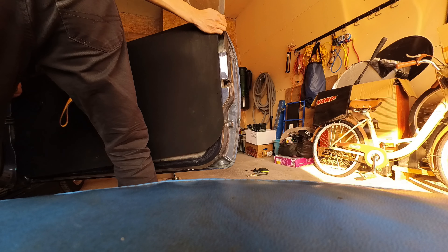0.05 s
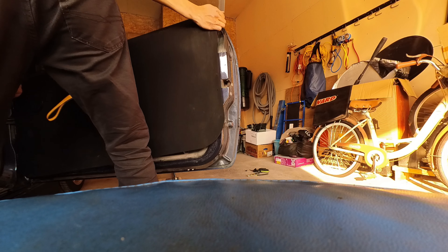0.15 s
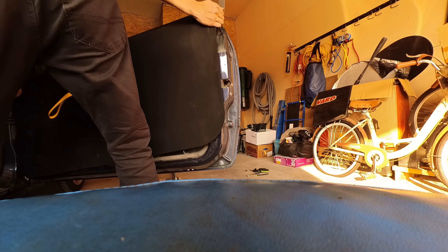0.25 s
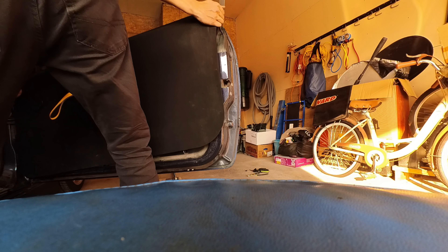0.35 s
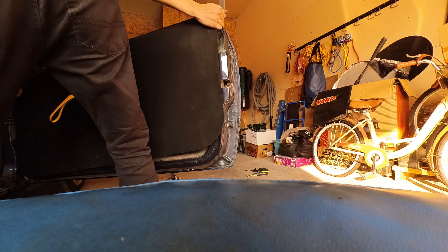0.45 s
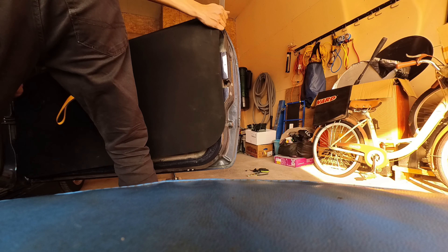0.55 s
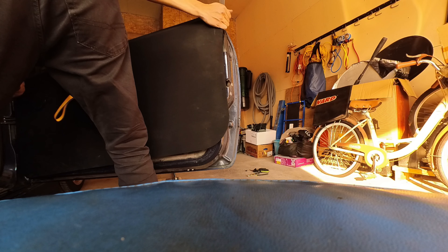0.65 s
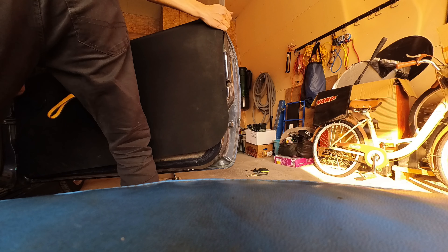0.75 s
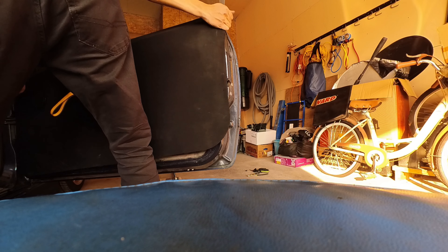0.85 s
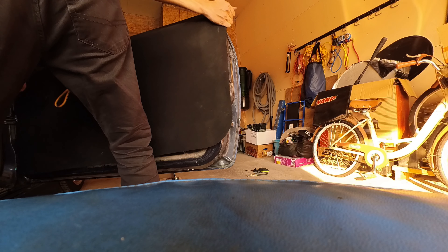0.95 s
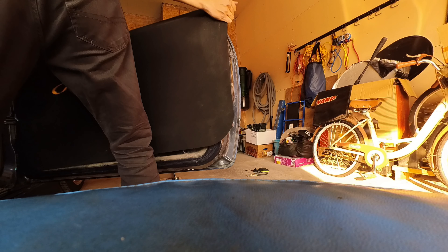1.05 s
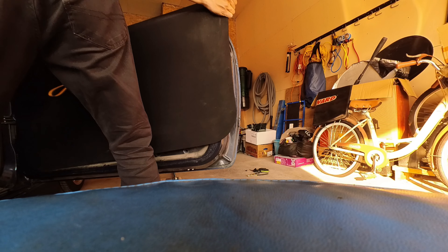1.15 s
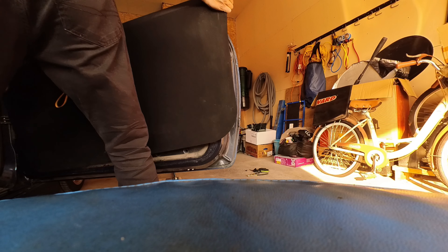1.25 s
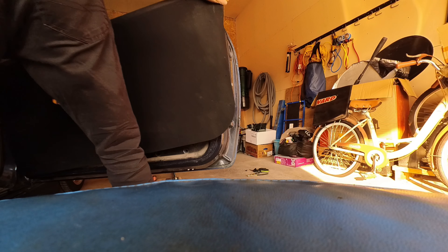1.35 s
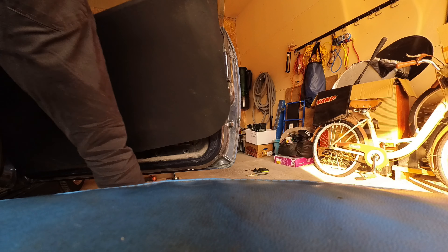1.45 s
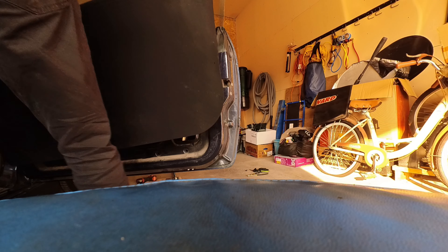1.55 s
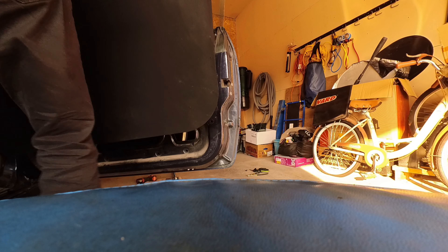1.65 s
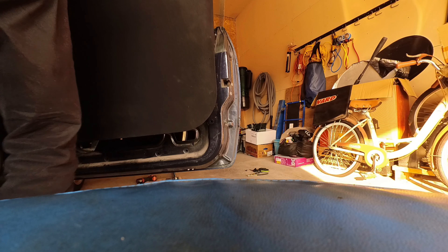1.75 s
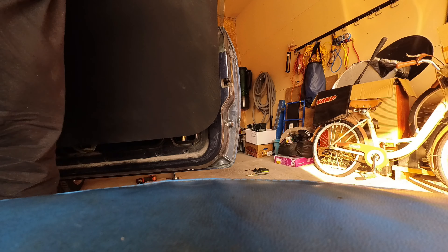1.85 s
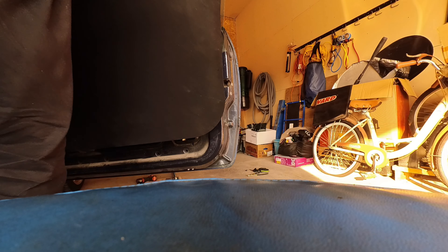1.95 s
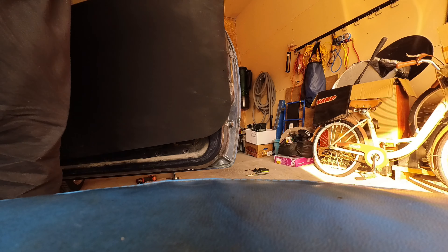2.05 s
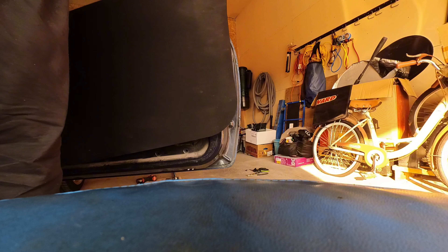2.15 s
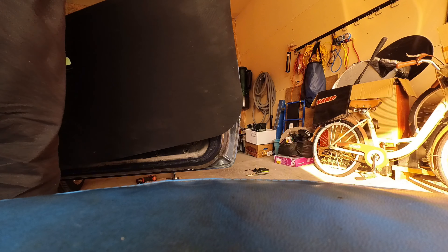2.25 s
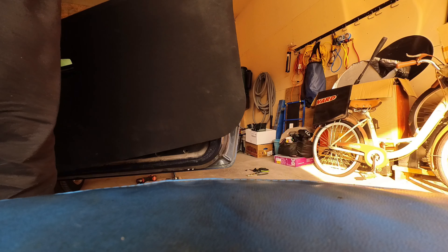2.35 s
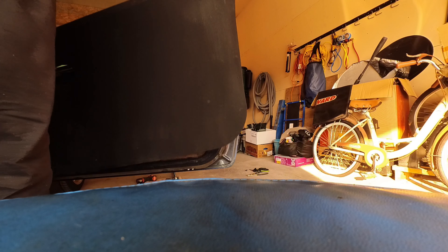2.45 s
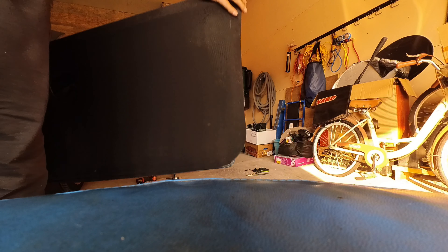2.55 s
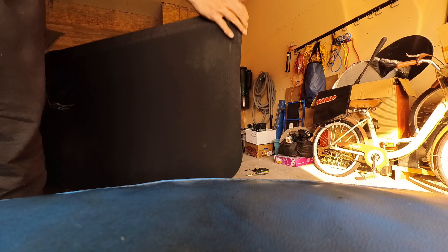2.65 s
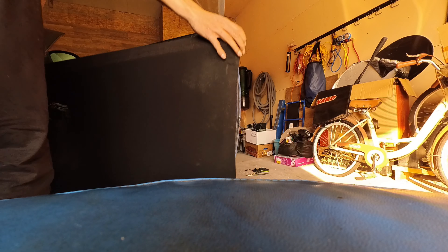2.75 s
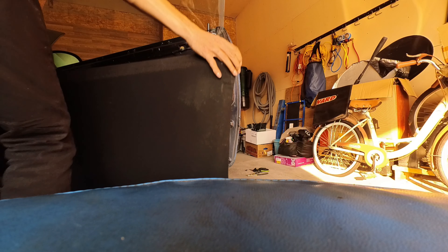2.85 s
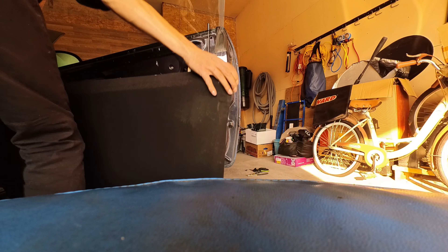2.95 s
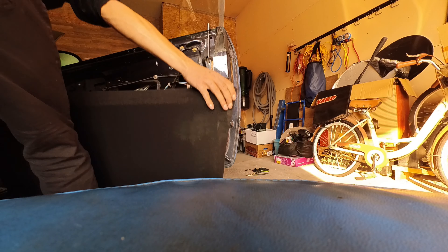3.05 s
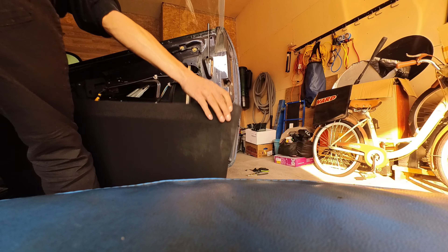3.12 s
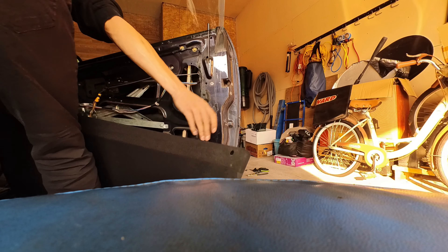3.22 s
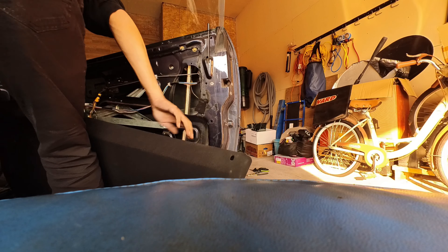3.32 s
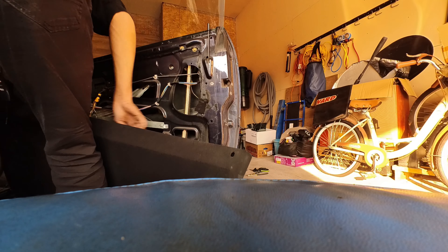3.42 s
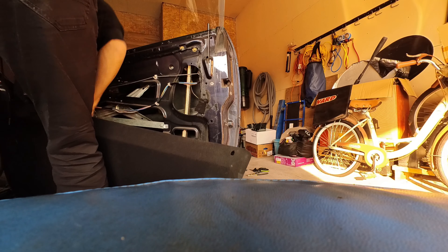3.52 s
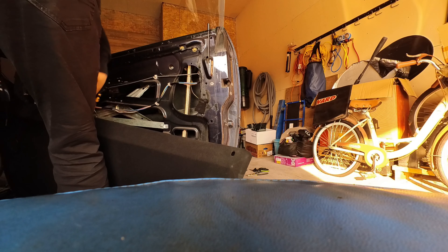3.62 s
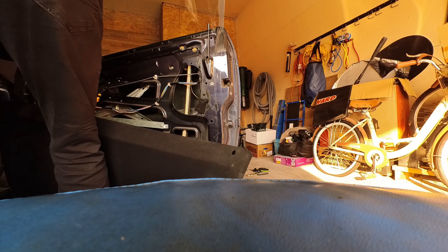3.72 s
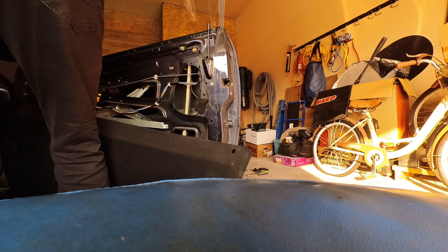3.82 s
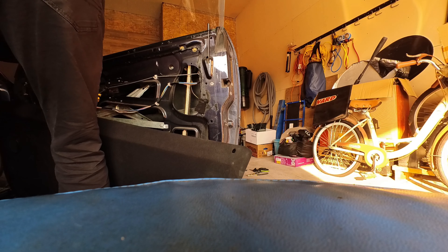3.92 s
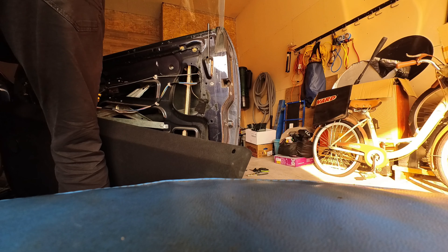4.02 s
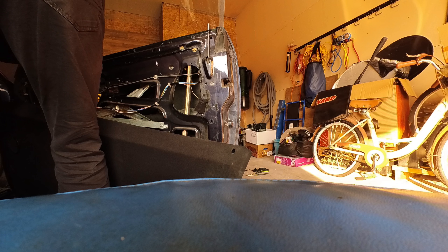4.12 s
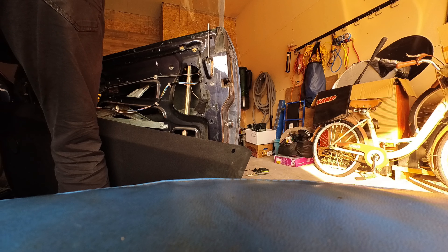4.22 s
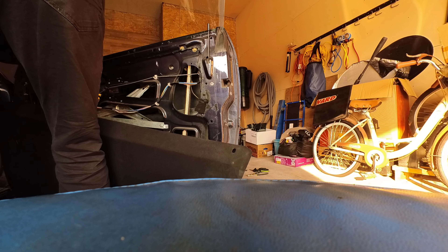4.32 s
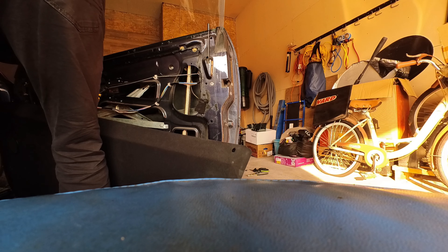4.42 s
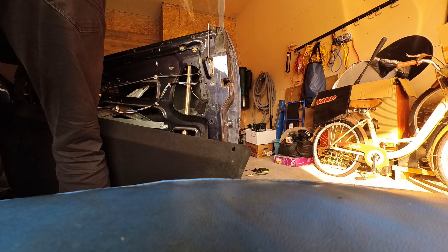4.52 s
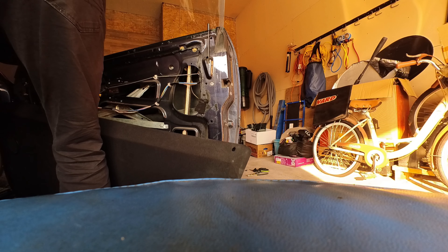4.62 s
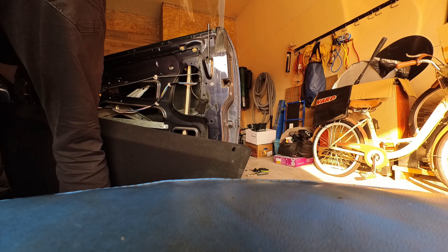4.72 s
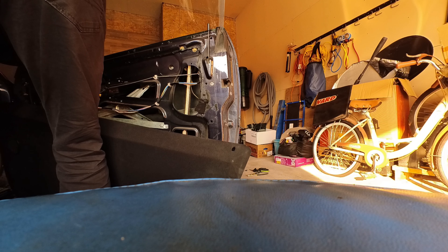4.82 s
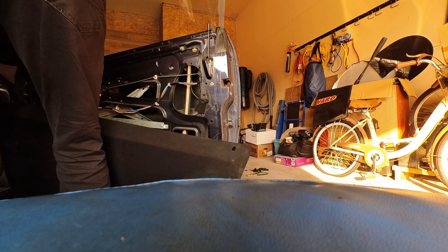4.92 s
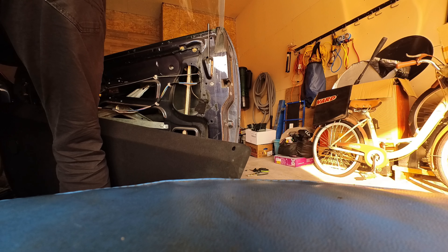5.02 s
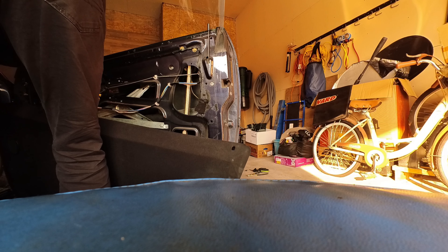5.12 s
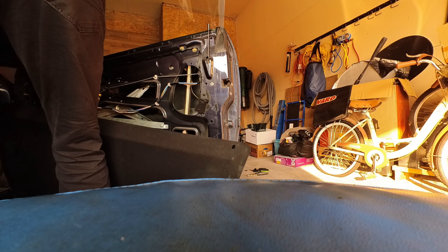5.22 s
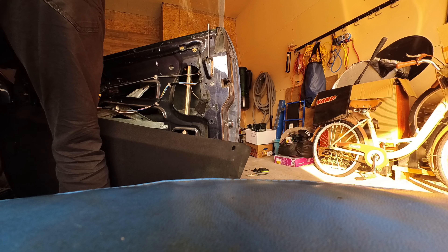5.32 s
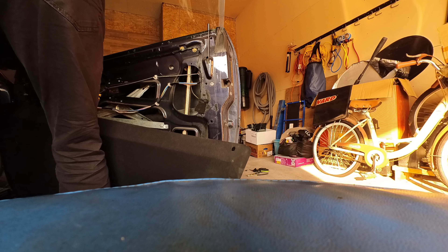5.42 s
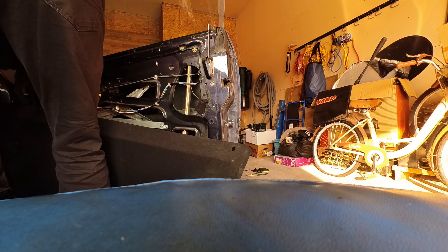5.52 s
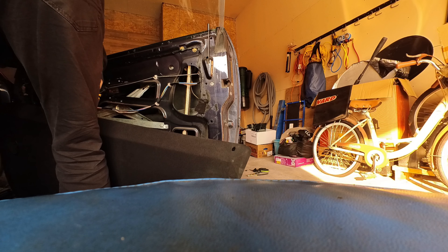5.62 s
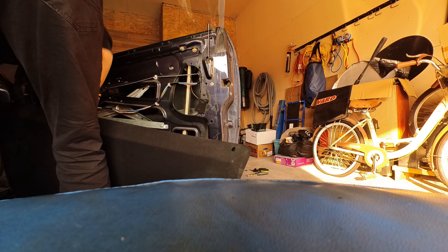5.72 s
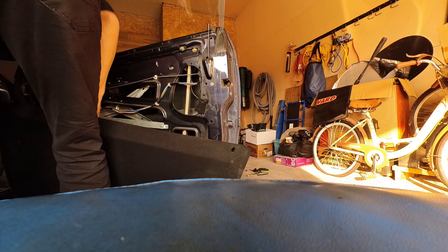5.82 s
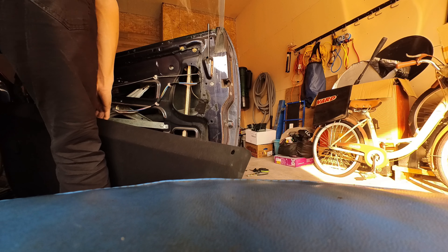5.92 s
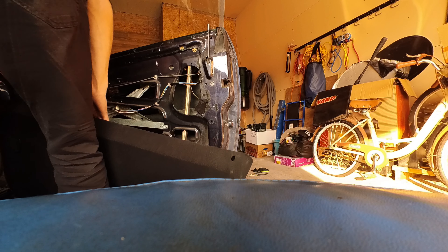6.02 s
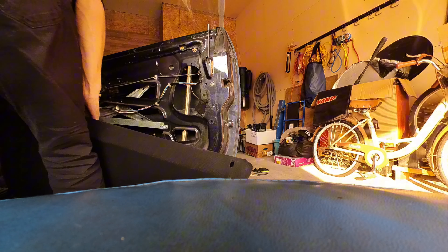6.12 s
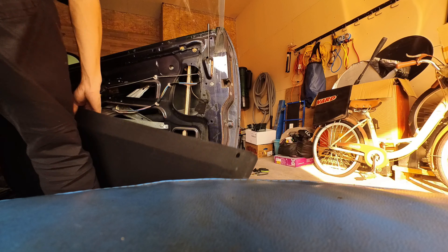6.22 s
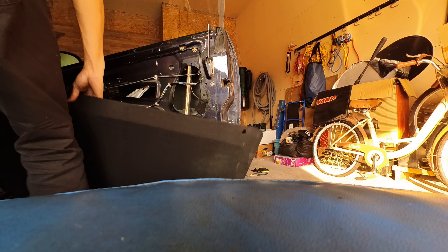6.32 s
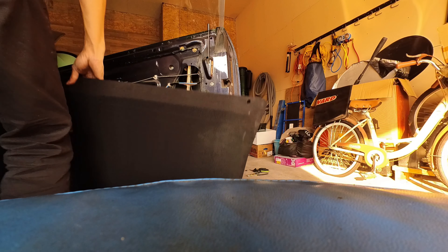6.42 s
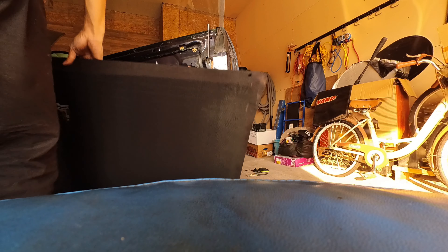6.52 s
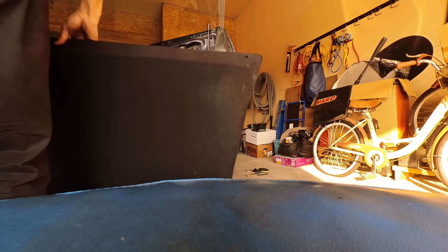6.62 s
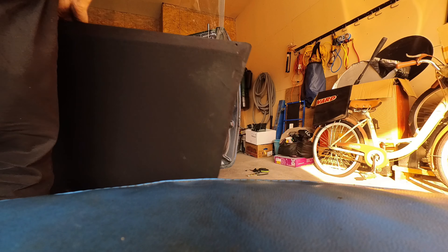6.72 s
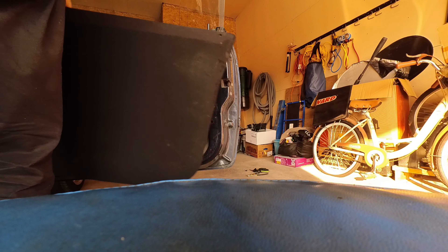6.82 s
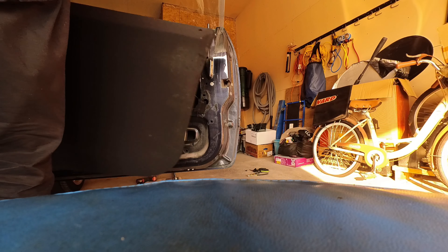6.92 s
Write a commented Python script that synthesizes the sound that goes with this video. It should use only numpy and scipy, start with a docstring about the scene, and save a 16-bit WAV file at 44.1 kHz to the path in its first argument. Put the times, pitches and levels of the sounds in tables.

```python
"""In a garage, a plastic trim panel is worked off a car door. It sticks and slips along the rubber seal,
snaps free and is lifted away. Lowered to the floor it slips, slaps down in a clatter, and knocks again
when picked up. Blows ring its modes and the flexing sheet pushes air. Hands and clothes rub the plastic,
small fittings click, and a steady rush like far traffic comes in from outside."""
import sys
import numpy as np
from scipy import signal
from scipy.fft import rfft, irfft, next_fast_len
from scipy.io import wavfile
from scipy.ndimage import map_coordinates

SR = 44100
rng = np.random.default_rng(int(sys.argv[2]) if len(sys.argv) > 2 else 0)


def digitize_waveform(pressure):
    """Quantize a signal to 16-bit integers and store it at the path in sys.argv[1].

    Rows of a 2-D input are taken as channels; values are limited to [-1, 1].
    """
    field = np.atleast_2d(pressure).T
    bounded = np.clip(field, -1, 1)
    quanta = np.round(bounded * 32767).astype(np.int16)
    wavfile.write(sys.argv[1], SR, quanta)


N = 306936
TIME_S = np.arange(N) / SR
T = np.arange(SR) / SR  # 1 s axis for single events
HZ = np.fft.rfftfreq(SR, 1 / SR)


def amp(db):
    return 10 ** (np.asarray(db) / 20)


def unit_rms(x):
    return x / np.sqrt(np.mean(x ** 2) + 1e-20)


def decay(t, t60_s):
    return np.exp(-np.log(1000) * t / t60_s)


def curve_at(points, hz):
    """Interpolate (freq_hz, value) points on a log frequency axis."""
    freqs, values = np.transpose(points)
    return np.interp(np.log(hz + 1), np.log(freqs + 1), values)


def wobble(rate_hz):
    """Smooth random curve, rate_hz knots per second."""
    knots = rng.standard_normal(int(N * rate_hz / SR) + 4)
    return map_coordinates(knots, [TIME_S * rate_hz])


def swell(peak_s, rise_s, fall_s, roundness):
    """Gain of 1 at peak_s, 20 dB down rise_s before and fall_s after."""
    t = TIME_S - peak_s
    distance = np.maximum(-t / rise_s, t / fall_s)
    return amp(-20 * np.minimum(distance ** roundness, 10))


def filtered(x, response):
    """Apply response(hz) by FFT."""
    size = next_fast_len(N + SR // 2)
    gain = response(np.fft.rfftfreq(size, 1 / SR))
    return irfft(rfft(x, size) * gain, size)[..., :N]


def noise(spectrum, flutter=1):
    """Mid/side noise, modulated by flutter, then coloured; rms 1."""
    white = flutter * rng.standard_normal((2, N))
    return unit_rms(filtered(white, lambda hz: amp(curve_at(spectrum, hz))))


def minimum_phase(spectrum):
    """Causal response with the given gains."""
    cepstrum = irfft(np.log(amp(curve_at(spectrum, HZ))))
    cepstrum[1:SR // 2] *= 2
    cepstrum[SR // 2 + 1:] = 0
    return np.exp(rfft(cepstrum))


def resonance(hz, q):
    """Second-order band-pass response."""
    damping = 1j * HZ * hz / q
    return damping / (hz * hz - HZ * HZ + damping)


def burst(spectrum):
    """First 0.1 s of a spectrum's waveform; peak 1."""
    x = irfft(spectrum)[:SR // 10]
    return x[None] / np.abs(x).max()


def add(track, start_s, sound):
    part = track[:, round(start_s * SR):][:, :sound.shape[1]]
    part += sound[:, :part.shape[1]]


# Hiss spectrum: freq_hz, gain_db
HISS_SPECTRUM = [(2000, 0), (5500, 0), (7200, -2), (9500, -12), (13500, -14), (15500, -24)]


def hiss(level_db=-84):
    """Faint steady noise floor."""
    return amp(level_db) * noise(HISS_SPECTRUM)


# Far rush spectrum: freq_hz, gain_db
RUSH_SPECTRUM = [(210, -46), (380, -4), (481, -1.5), (554, -3.5), (660, -3), (1000, 1), (1580, -4),
                 (2100, -12), (2890, -22.5), (4090, -43), (4700, -61.5), (6000, -110)]
# Low rumble spectrum: freq_hz, gain_db
RUMBLE_SPECTRUM = [(15, 20.5), (30, -12), (55, 12.5), (100, 12), (130, 14.5), (190, 12), (270, 14.5),
                   (370, 4), (520, -22), (1500, -120)]


def outside(rush_db=-44, swell_db=3.5, peak_s=4.2349, width_s=1.4029, rumble_db=-46):
    """A far rush swells once over a low rumble; both waver slightly."""
    lift_db = swell_db * np.exp(-((TIME_S - peak_s) / width_s) ** 2)
    rush = amp(rush_db + lift_db + 0.38 * wobble(6.5)) * noise(RUSH_SPECTRUM)
    rumble = amp(rumble_db + 0.76 * wobble(6.5)) * noise(RUMBLE_SPECTRUM)
    return rush + rumble


# Room decay: freq_hz, t60_s
GARAGE_DECAY = [(80, 0.933), (300, 0.691), (1000, 0.6849), (3000, 0.5263), (6000, 0.442), (10000, 0.32),
                (15000, 0.6)]


def garage(wet_db, early_db):
    """Mid/side impulse response: direct path, scatter from near clutter, room tail."""
    hz, t, bands = signal.stft(rng.standard_normal((2, SR)), SR, nperseg=256)
    bands *= decay(t, curve_at(GARAGE_DECAY, hz)[:, None])
    tail = signal.istft(bands, SR, nperseg=256)[1][:, :SR] * (1 - decay(T, .05))
    early = rng.standard_normal((2, SR)) * decay(T, 0.12072) * (1 - decay(T, 0.012))
    paths = (amp(wet_db) * unit_rms(tail) + amp(early_db) * unit_rms(early)) / np.sqrt(SR)
    paths[0, 0] += 1  # direct path, mid only
    return paths


def catches(grain_db=1.2729, clump_db=1.5, grit=0.16):
    """Uneven grip of a rubbed surface: fine grain in clumps, with harder snags on ridges."""
    grain = amp(grain_db * wobble(700) + clump_db * wobble(60))
    snags = np.clip(wobble(180), 0, 2) ** 3
    return grain * (1 + grit * snags)


# Friction spectra of rub, high swish and edge drag: freq_hz, gain_db
RUB_SPECTRUM = [(600, -27), (1500, -2), (3000, 10.5), (4200, 2.5), (5300, 1), (6100, -4), (7200, -3),
                (9500, -10.5), (12000, -30.5), (16000, -45.5)]
SWISH_SPECTRUM = [(6000, -28.5), (9500, -10), (12000, -4), (13700, 0), (15800, -11)]
DRAG_SPECTRUM = [(500, -18.5), (1300, 7.5), (2500, 4.5), (3200, -2), (4100, -15), (5500, -21),
                 (9000, -48.5), (15000, -39.5)]
# Treble resonances colouring the rustle: centre_hz, half_width_hz, gain_db
RUSTLE_PEAKS = [(2960.7, 130, -4), (4987.8, 185, 1.5), (5742.4, 140, -6), (6757.4, 170, -1),
                (7687, 200, -1), (11400, 180, -9), (13600, 350, -2.5)]
# Strokes of hands, cloth and panel edge: peak_s, rub_db, swish_db, drag_db, rise_s, fall_s
RUSTLE_STROKES = [(.105, -61, -70.5, -42.5, 0.08605, 0.2434), (.34, -67, -77.5, -64, 0.16, 0.3236),
                  (.68, -66, -75.5, -47.5, 0.0687, 0.1257), (.79, -84, -85, -57, 0.137, 0.8872),
                  (1.0, -67, -83, -52, 0.184, 0.3769), (1.61, -57, -69, -57.5, 0.11335, 0.1724),
                  (1.91, -59, -67, -64.5, 0.12, 0.1011), (2.14, -71, -77.5, -68.5, 0.415, 0.0008),
                  (2.49, -66.5, -73, -71, 0.0397, 0.3934), (2.66, -59, -63.5, -56, 0.2253, 0.1332),
                  (2.82, -71, -75, -60, 0.1393, 0.431), (2.99, -58.5, -68.5, -48.5, 0.10024, 0.1421),
                  (3.16, -53, -67.5, -52, 0.09986, 0.2418), (3.3, -53, -59.5, -46, 0.2349, 0.0359),
                  (6.02, -77.5, -83.5, -63.5, 0.1811, 0.5634), (6.28, -62, -80, -48, 0.1117, 0.0948),
                  (6.37, -56.5, -69.5, -56.5, 0.087, 0.0715), (6.68, -67.5, -76, -68, .45, .45)]


def rustle(drag_exponent=1.4934):
    """Hands and cloth slide over grained plastic; under firm pressure the edge adds a lower rasp."""
    rub, swish, drag = np.zeros((3, N))
    for peak_s, rub_db, swish_db, drag_db, rise_s, fall_s in RUSTLE_STROKES:
        pressure = swell(peak_s, rise_s, fall_s, roundness=1.0497)
        rub += (amp(rub_db) * pressure) ** 2
        swish += (amp(swish_db) * pressure) ** 2
        drag += (amp(drag_db) * pressure ** drag_exponent) ** 2
    layers = [(rub, RUB_SPECTRUM), (swish, SWISH_SPECTRUM), (drag, DRAG_SPECTRUM)]
    friction = sum(np.sqrt(power) * noise(spectrum, catches()) for power, spectrum in layers)

    def colour(f):
        return 1 + sum(amp(db) / (1 + ((f - hz) / width) ** 2) for hz, width, db in RUSTLE_PEAKS)

    return filtered(friction, colour)


def slip_pings(start_s=.166, count=10, first_gap_s=.012, gap_ratio=1.178, first_hz=14390, first_db=-49):
    """Tight slips ring a tiny high resonance: sparser, louder and lower as the panel slows."""
    rise_db_per_s, sag_hz_per_s = 24.5, 7500
    out = np.zeros((2, N))
    gaps_s = first_gap_s * gap_ratio ** np.arange(count - 1)
    for age_s in np.append(0, np.cumsum(gaps_s)):
        db = first_db + rise_db_per_s * age_s
        hz = first_hz - sag_hz_per_s * age_s
        slip = rng.standard_normal(SR) * decay(T, 0.0094)
        ping = burst(rfft(slip) * resonance(hz, q=9) * resonance(hz, q=2))
        room = garage(wet_db=-13.5, early_db=-9.0)
        add(out, start_s + age_s, amp(db) * signal.fftconvolve(ping, room, axes=1))
    return out


# Modes of the steel fittings: pitch_hz, level_db, t60_s
STEEL_MODES = [(5033, -28.5, .3), (5400, -36, 0.298), (6650, -34.5, .28), (6945, -32, .3), (7450, -35, .25),
               (11550, -27.5, .16)]


def steel_ring(scatter_db=2.0):
    """Decaying modes, at new strengths for each strike."""
    return sum(amp(db + rng.normal(0, scatter_db)) * np.cos(2 * np.pi * hz * T) * decay(T, t60_s)
               for hz, db, t60_s in STEEL_MODES)


# Radiation of the fittings: freq_hz, gain_db
FITTING_RESPONSE = [(300, -4.5), (1500, 5.5), (2800, 11), (4000, -4), (5500, -1.5), (7200, -7.5),
                    (9500, -17), (13500, -11), (15700, -23)]
# Clicks of clips and fittings: start_s, level_db, centre_hz, chatter_t60_s
FITTING_CLICKS = [(1.082, -49, 8450, .05), (1.153, -50.5, 5000, .03), (1.857, -40, 8710, 0.1226),
                  (2.7807, -36.5, 3882, 0.008585), (2.984, -44, 5399, .069), (3.1672, -26, 4394, .02),
                  (3.177, -27, 5600, .035), (3.345, -31, 5991, .04), (3.356, -18.5, 5973, 0.034534),
                  (3.4315, -36, 4908, .017), (3.83, -49, 6518, .15), (3.851, -42.5, 7650, 0.0711),
                  (4.05, -46.5, 6498, 0.02502), (5.271, -34, 4004, 0.022), (5.278, -29.5, 8513, 0.014254),
                  (6.1749, -27, 3412, 0.0138), (6.1995, -39.5, 4505, .02), (6.36, -36.5, 4255, 0.019),
                  (6.597, -48.5, 13000, .073), (6.6611, -42, 3000, .02)]


def fitting_clicks(q=1.2788, steel_db=-32):
    """Small hard parts chatter briefly and ring the steel faintly."""
    out = np.zeros((2, N))
    colour = minimum_phase(FITTING_RESPONSE)
    for start_s, db, hz, t60_s in FITTING_CLICKS:
        chatter = rng.standard_normal(SR) * decay(T, t60_s) * (1 - decay(T, t60_s))
        click = burst(rfft(chatter) * colour * resonance(hz, q))
        response = garage(wet_db=-9.5, early_db=-7.5) + amp(steel_db) * steel_ring()
        add(out, start_s, amp(db) * signal.fftconvolve(click, response, axes=1))
    return out


# Seal scrape spectrum: freq_hz, gain_db
SCRAPE_SPECTRUM = [(60, -12.5), (130, 2.5), (250, -2.5), (420, -5.5), (700, -14.5), (1500, -21.5),
                   (2800, -29.5), (4200, -46.5), (9000, -60), (16000, -85)]


def seal_judder(slip_hz=98, jitter=0.04919, shudder_db=-26.0, scrape_db=-31):
    """One pull: the panel sticks and slips on the rubber seal at a low mode; each slip scrapes."""
    pull = dict(peak_s=0.14934, rise_s=0.2123, fall_s=0.32487)
    phase = 2 * np.pi * np.cumsum(slip_hz * (1 + jitter * wobble(40.326))) / SR
    swing = unit_rms(np.sin(phase) * amp(1.4 * wobble(50)))
    slips = noise(SCRAPE_SPECTRUM, flutter=amp(2 * np.sin(phase)))
    shudder = amp(shudder_db) * swell(**pull, roundness=1.0814) * swing
    scrape = amp(scrape_db) * swell(**pull, roundness=1.983) * slips
    return shudder + scrape


# Flexes of the whole sheet: start_s, level_db, pitch_hz, swings
PANEL_FLEXES = [(.755, -33, 90, 1.104), (.93, -34, 61.57, 4.918), (1.057, -21, 79.81, 1.087),
                (1.503, -28.5, 84.14, 1.2084), (1.936, -32.5, 57.67, 1.195), (2.75, -39.5, 33.04, 1.2),
                (3.342, -21.5, 125.8, 1.424), (3.385, -19.5, 82.29, 1.443)]


def panel_flexes():
    """The sheet bulges and springs back, pushing air in one or a few slow swings."""
    out = np.zeros((2, N))
    for start_s, db, hz, swings in PANEL_FLEXES:
        envelope = np.exp(-2 * (2 * hz * T / swings - .85) ** 2)
        swing = envelope * np.sin(2 * np.pi * hz * T)
        room = garage(wet_db=-7.0, early_db=-3.5)
        add(out, start_s, amp(db) * signal.fftconvolve(swing[None], room, axes=1))
    return out


# Modes of panel and door shell: pitch_hz, level_db, t60_s
PANEL_MODES = [(77.78, -29, .45), (98.208, -17.5, 0.5856), (162, -13.5, 0.3914), (239.48, -25.5, 0.7177),
               (300.05, -28.5, .5), (319, -21.5, 0.3976), (342.22, -19, 0.3), (428.49, -25, 0.5217),
               (456.52, -29, 0.37), (526.79, -28, 0.3), (615.22, -29.5, 0.42), (676.56, -21, 0.2784),
               (721.76, -28, 0.3598), (834, -19.5, 0.22), (877.57, -28.5, 0.6328), (952.4, -27, 0.33),
               (1146.1, -23, 0.2369), (1302, -35.5, 0.31), (1426.7, -24.5, 0.25), (1949.4, -25.5, 0.1821),
               (2460, -35, .35), (2876.8, -38.5, .2)]


def panel_ring(blows, rise_s=0.00067, drift_rad=0.12):
    """Blows feed energy to modes near their contact frequency; each mode leaks it away."""
    start_s, blow_db, contact_hz, q = np.transpose(blows)
    onsets = np.round(start_s * SR).astype(int)
    rise_pole = np.exp(-1 / (rise_s * SR))
    out = np.zeros(N)
    for hz, mode_db, t60_s in PANEL_MODES:
        share = 1 / (1 + (q * (hz / contact_hz - contact_hz / hz)) ** 2)
        energy_in = np.bincount(onsets, amp(blow_db) ** 2 * share, N)
        energy = signal.lfilter([1], [1, -decay(2 / SR, t60_s)], energy_in + 1e-20)
        envelope = signal.lfilter([1 - rise_pole], [1, -rise_pole], np.sqrt(energy))
        drift = np.interp(TIME_S, np.arange(0, 7, .02), rng.standard_normal(350))
        phase = 2 * np.pi * (hz * TIME_S + rng.random()) + drift_rad * drift
        out += amp(mode_db) * envelope * np.sin(phase)
    return out


def floor_clatter(start_s=3.346, length_s=.03, count=6, level_db=-9.5, centre_hz=968.3, q=0.9905):
    """Quick uneven contacts as the panel lands; rows as in PANEL_BLOWS."""
    scatter_octaves = 0.778
    times_s = start_s + length_s * (np.arange(count) + rng.random(count)) / count
    offset_db, pitch_offset = rng.uniform(-0.82, 1, (count, 2)).T
    contact_hz = centre_hz * 2 ** (scatter_octaves * pitch_offset)
    return np.column_stack([times_s, level_db + offset_db, contact_hz, np.full(count, q)])


# Radiation of the plastic panel: freq_hz, gain_db
PANEL_RESPONSE = [(30, -9.5), (80, 2), (220, 1), (330, 3), (480, 1.5), (700, 5.5), (950, 1), (1600, -2),
                  (2700, -2), (3900, -16), (6000, -16.5), (9000, -24.5), (16000, -34.5)]
# Blows on the panel: start_s, level_db, contact_hz, q
PANEL_BLOWS = [(1.0766, -30, 1100, 3), (1.0804, -10, 1121, 13.073), (1.0886, -18, 256.5, 4.652),
               (1.1003, -22.5, 719.2, 2), (1.112, -21, 1154, 11), (1.156, -19.5, 1538, 2.3),
               (1.854, -24.5, 472.8, 1.878), (1.866, -25, 900.3, 0.798), (3.069, -27, 150.3, 0.77),
               (3.172, -30, 170.4, 0.98), (3.3388, -5, 558.2, 0.86), (3.3415, -5, 280.5, 0.4674),
               (3.3597, -6, 854.4, 0.58), (3.375, -5.5, 409.1, 2.4), (3.3804, -7.5, 642, 0.989),
               (3.39, -6.5, 351.2, 1.6535), (3.432, -10.5, 1200, 0.65), (3.437, -13, 800, .98),
               (3.488, -19.5, 120.1, 1.1), (3.519, -19.5, 904, 1.092), (5.2705, -25, 1200, 0.421),
               (5.2785, -29.5, 1001, 0.729), (6.1743, -13.5, 755.7, 0.93), (6.1995, -28.5, 1100, 0.93),
               (6.599, -26.5, 433.3, 3.712)]


def panel_knocks(blows, hardness=2.409):
    """Each blow is a short damped push of the sheet; slower contact gives a duller edge."""
    out = np.zeros((2, N))
    colour = minimum_phase(PANEL_RESPONSE)
    for start_s, db, contact_hz, q in blows:
        lowpass = 1 / (1 + 1j * HZ / (hardness * contact_hz))
        push = burst(colour * resonance(contact_hz, q) * lowpass)
        room = garage(wet_db=-7.5, early_db=-0.7358)
        add(out, start_s, amp(db) * signal.fftconvolve(push, room, axes=1))
    return out


# Stereo width: freq_hz, side_gain_db
STEREO_WIDTH = [(1200, -71), (2200, -63), (3500, -12), (8000, -8.5), (13000, -10), (15000, -22)]


def scene():
    """Mid/side mix to left/right; only the treble is wide."""
    noise_floor = hiss()
    blows = np.vstack([PANEL_BLOWS, floor_clatter()])
    panel = panel_knocks(blows) + panel_ring(blows) + panel_flexes()
    mid, side = panel + fitting_clicks() + slip_pings() + seal_judder() + rustle() + outside() + noise_floor
    side = filtered(side, lambda hz: amp(curve_at(STEREO_WIDTH, hz)))
    return np.array([mid + side, mid - side])


def record(dry):
    """Brick-wall low-pass at 15750 Hz."""
    return filtered(dry, lambda hz: hz < 15750)


dry = scene()
out = record(dry)
digitize_waveform(out)
```